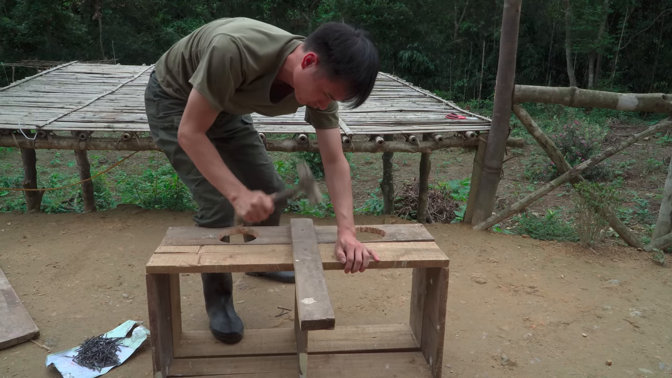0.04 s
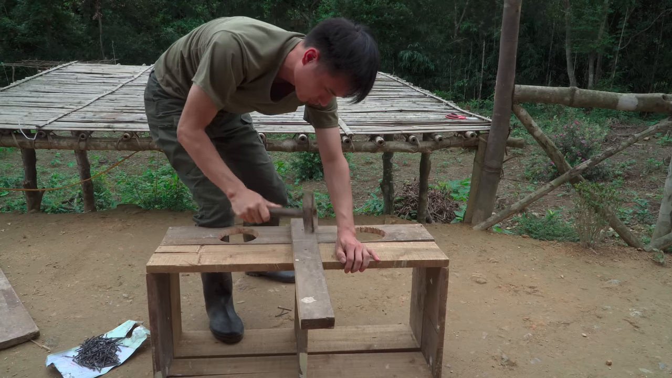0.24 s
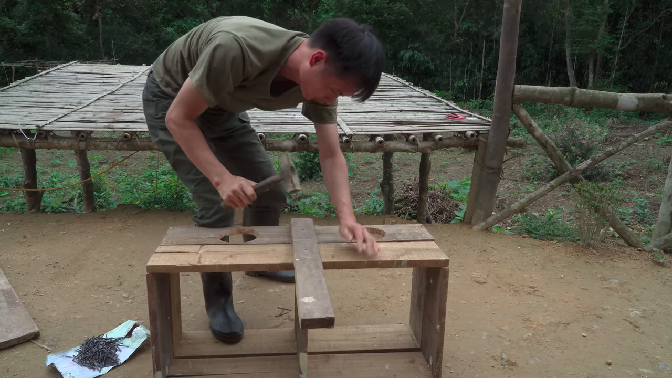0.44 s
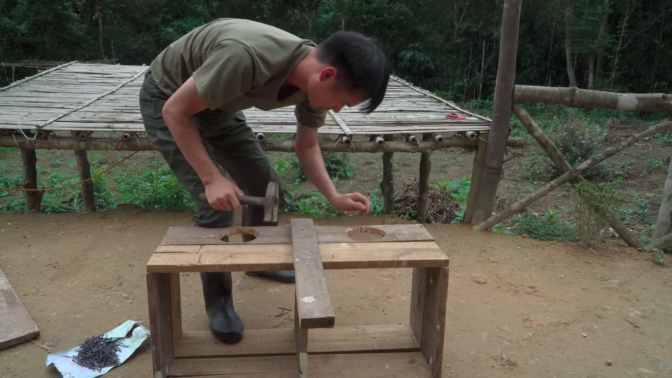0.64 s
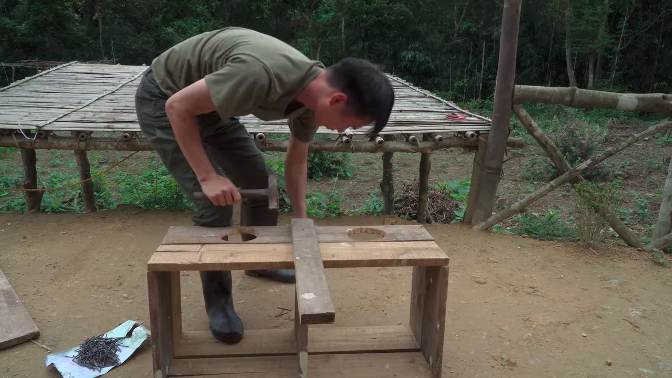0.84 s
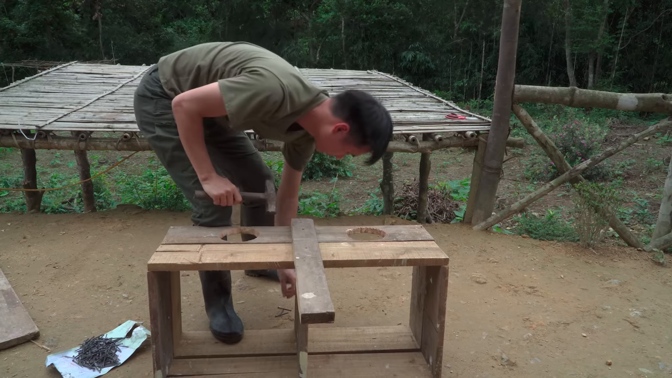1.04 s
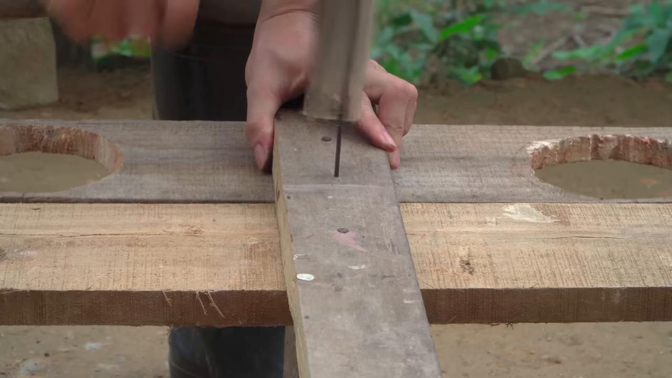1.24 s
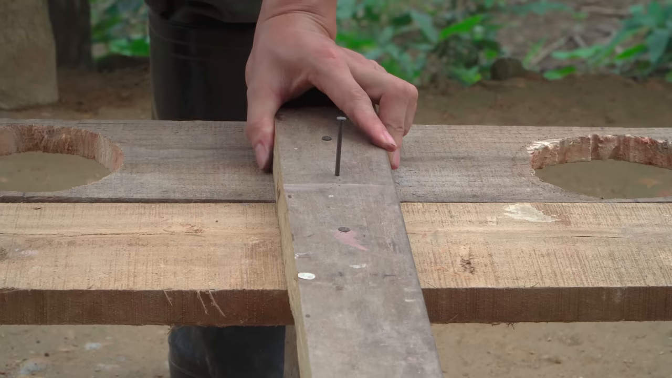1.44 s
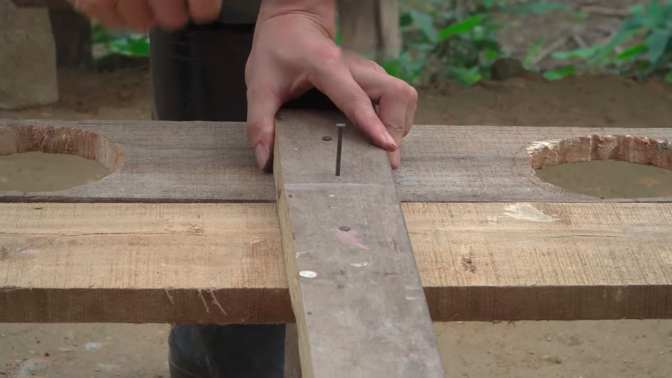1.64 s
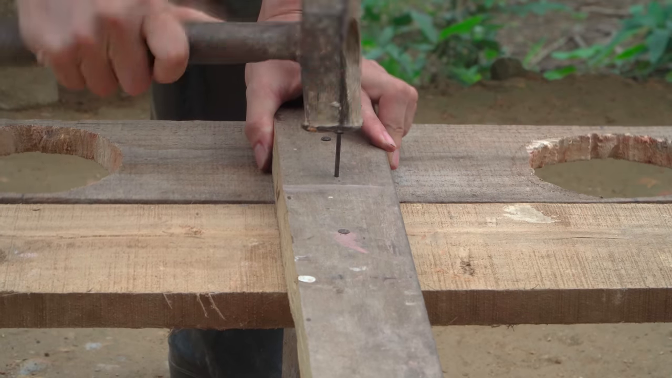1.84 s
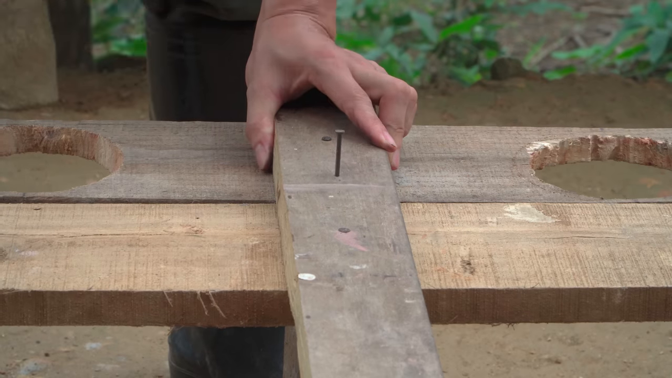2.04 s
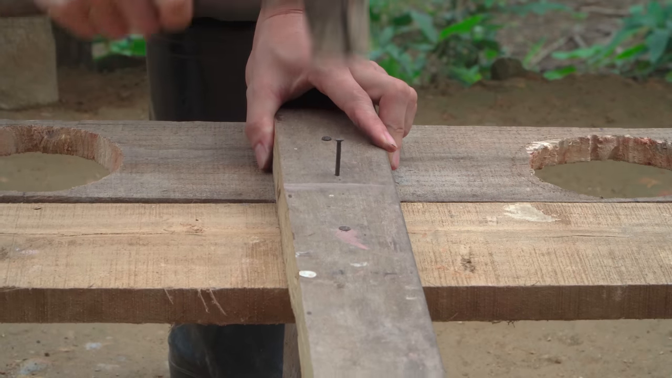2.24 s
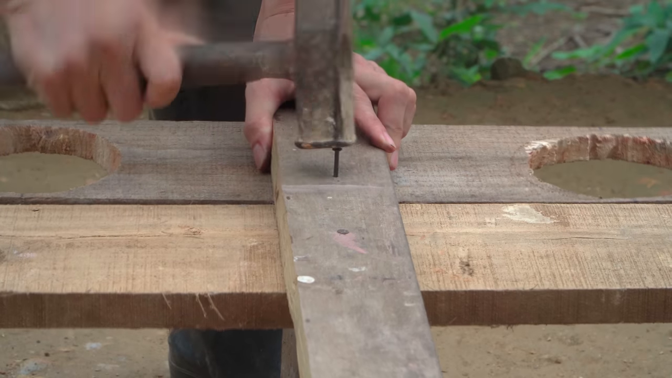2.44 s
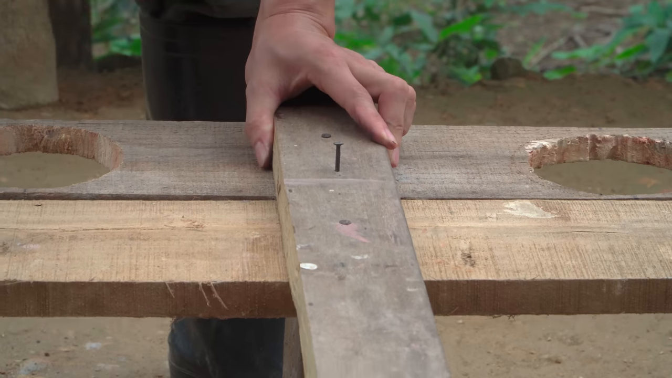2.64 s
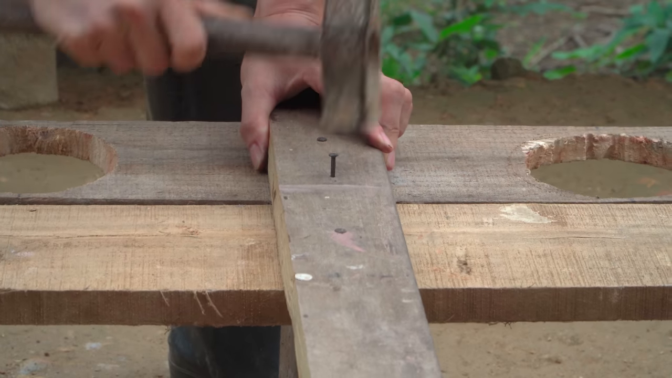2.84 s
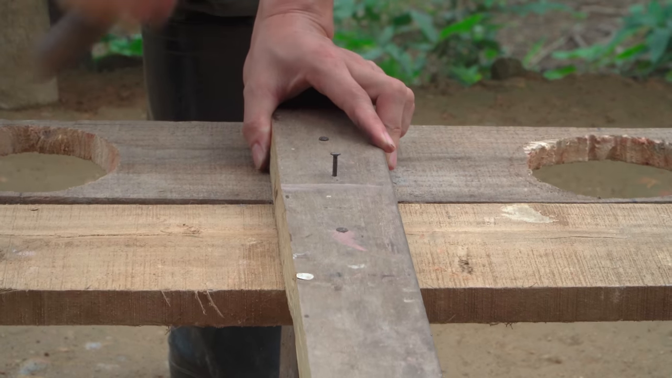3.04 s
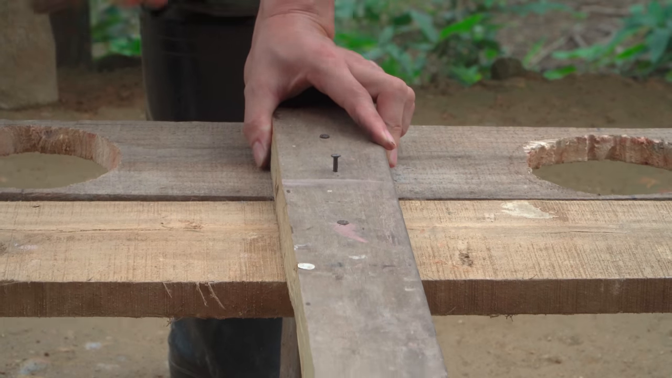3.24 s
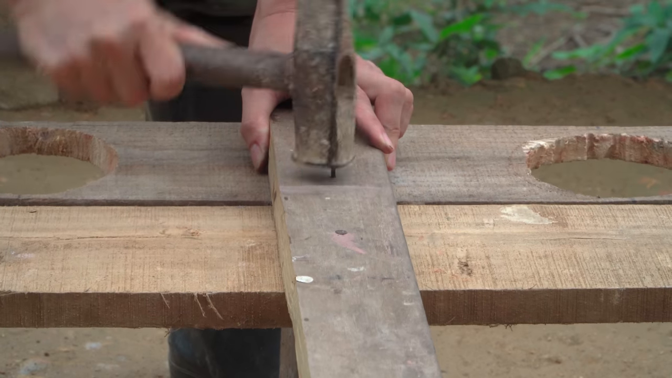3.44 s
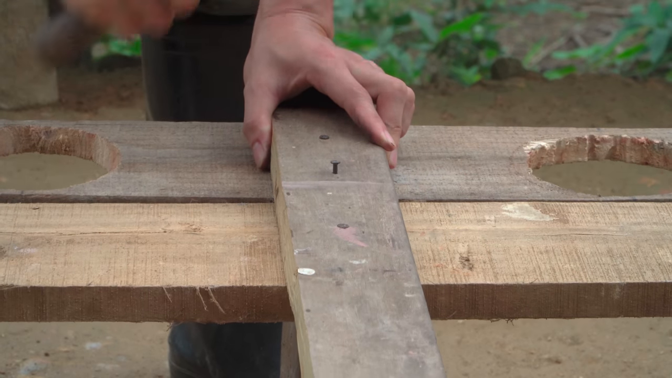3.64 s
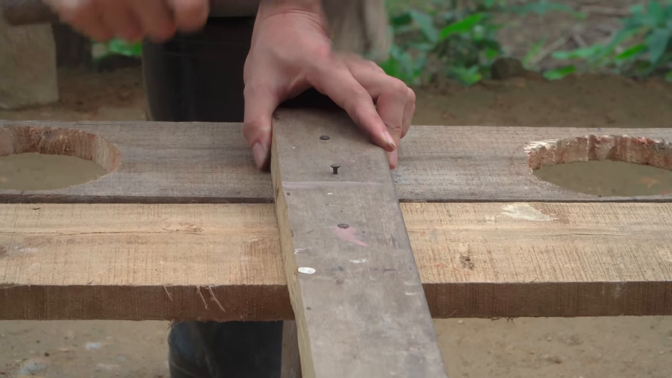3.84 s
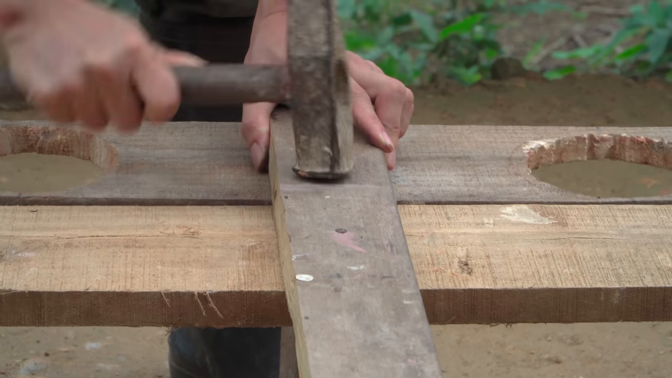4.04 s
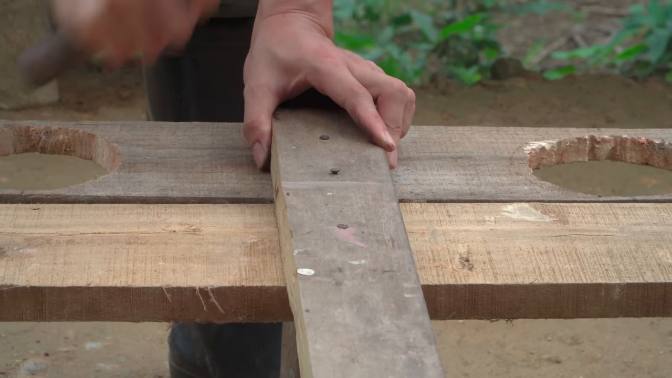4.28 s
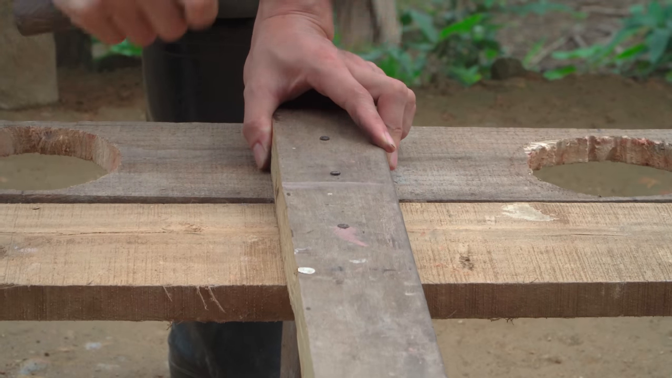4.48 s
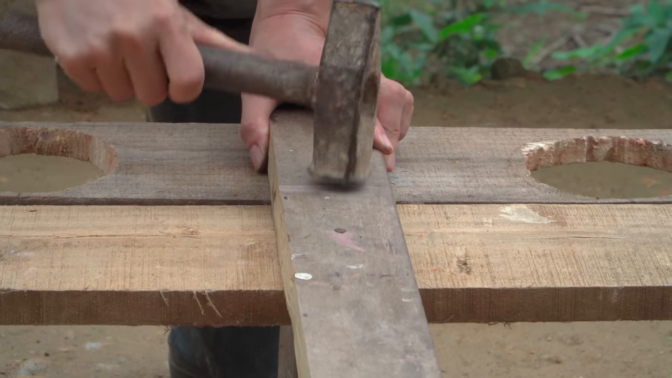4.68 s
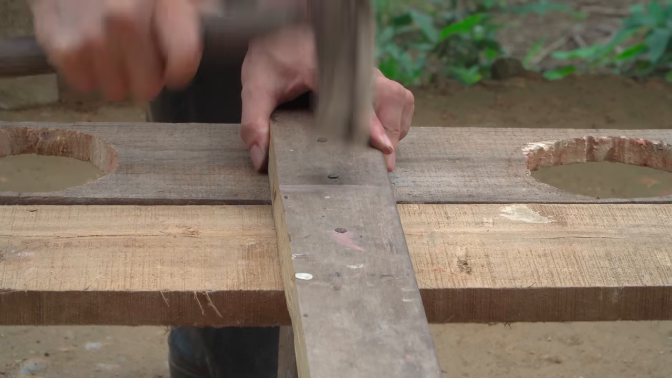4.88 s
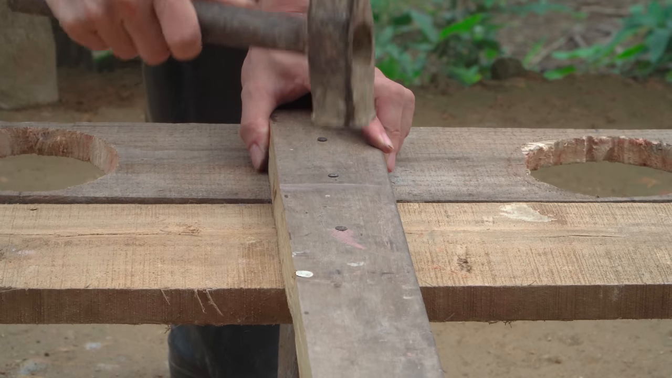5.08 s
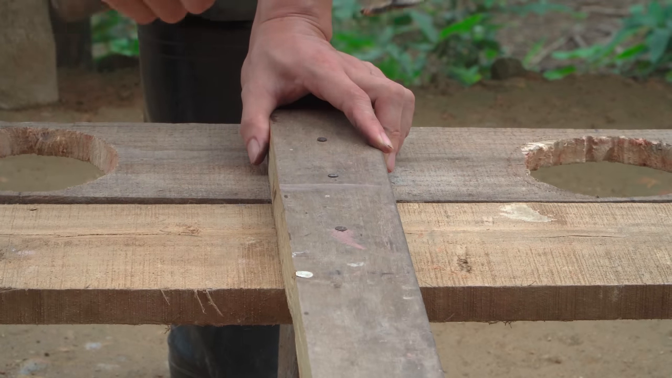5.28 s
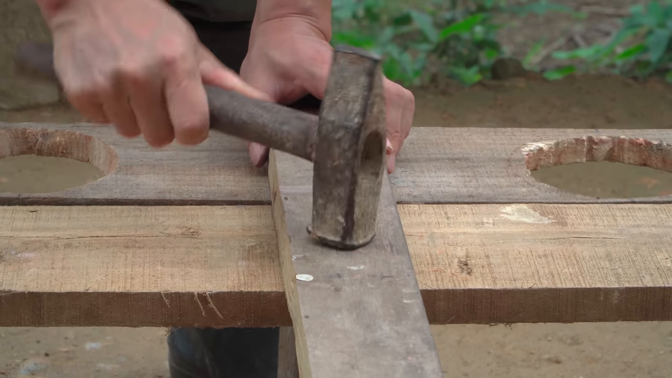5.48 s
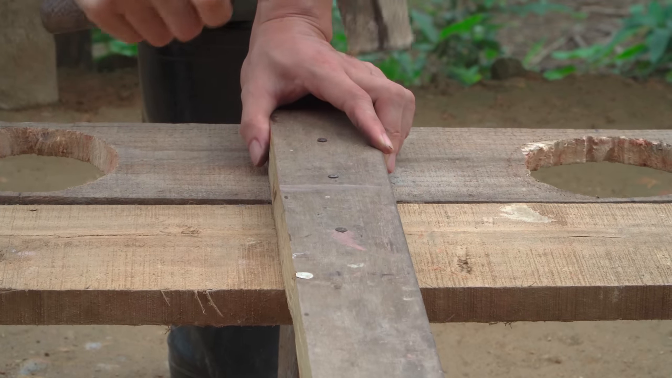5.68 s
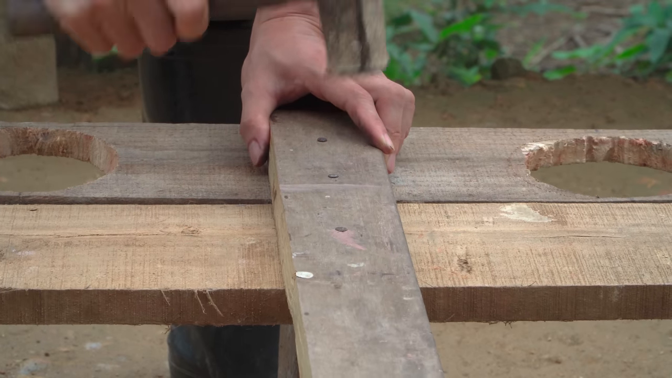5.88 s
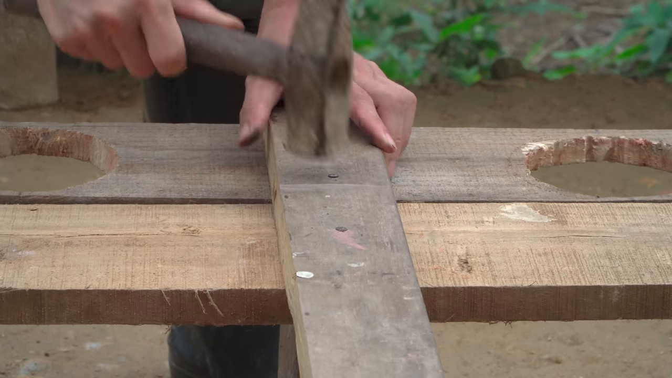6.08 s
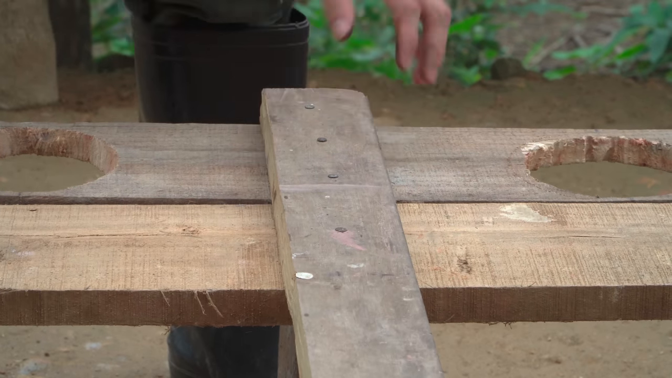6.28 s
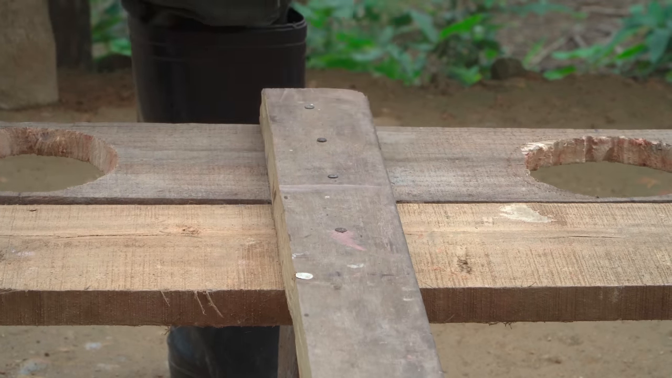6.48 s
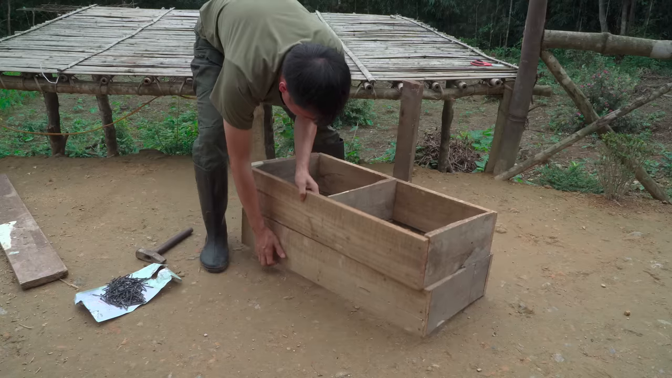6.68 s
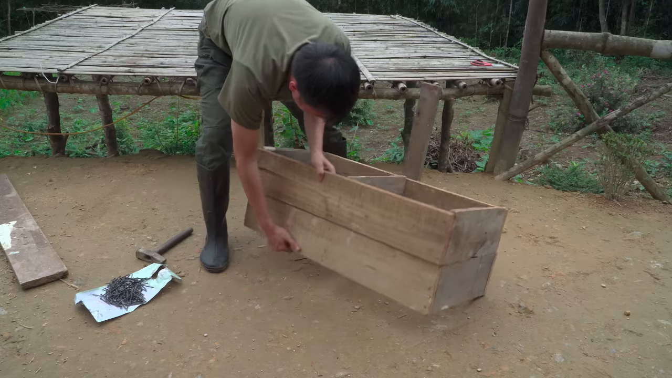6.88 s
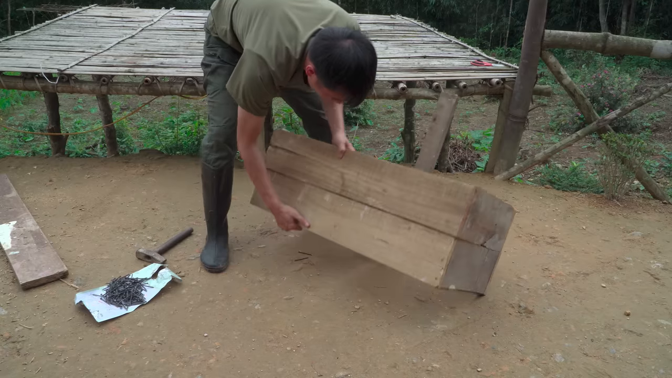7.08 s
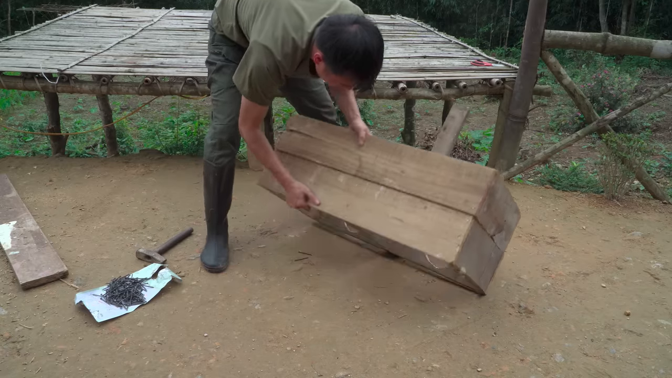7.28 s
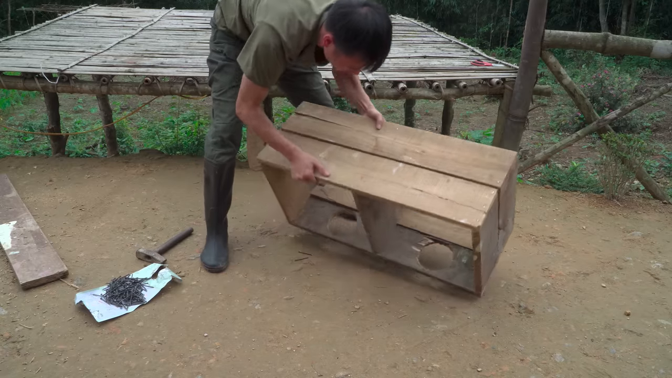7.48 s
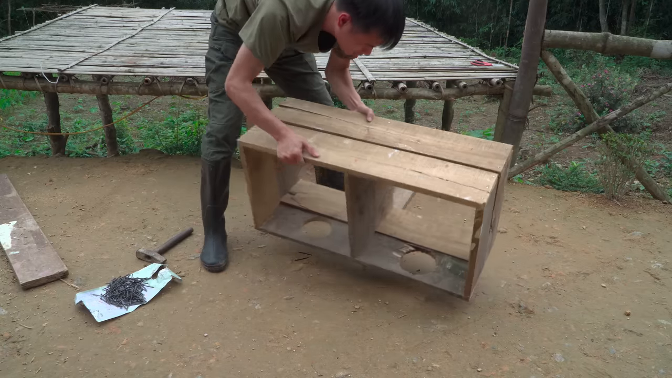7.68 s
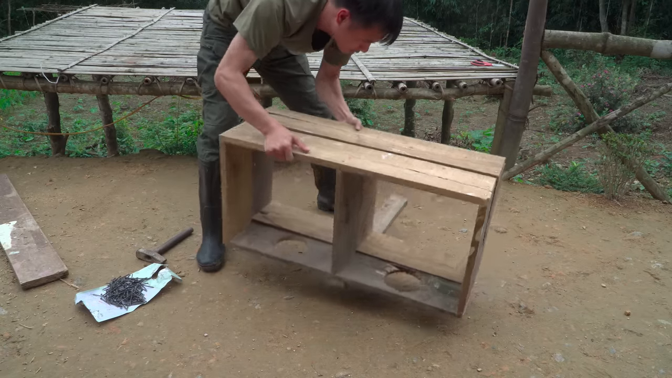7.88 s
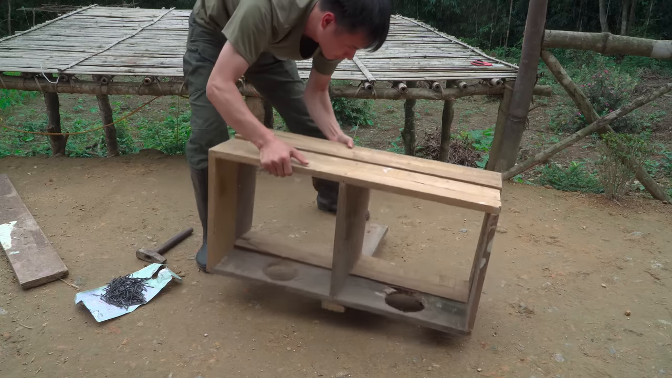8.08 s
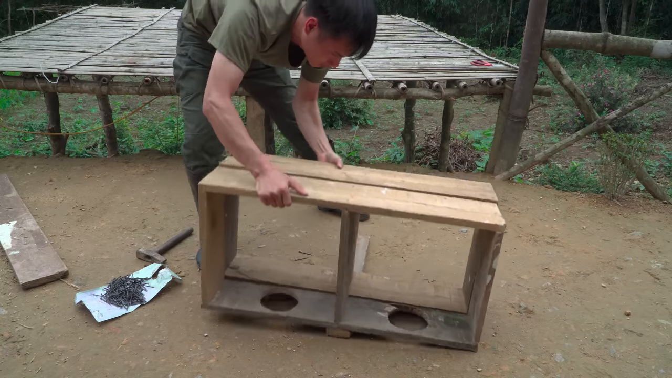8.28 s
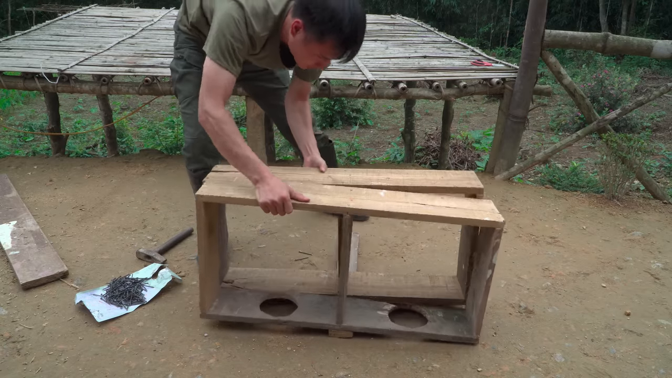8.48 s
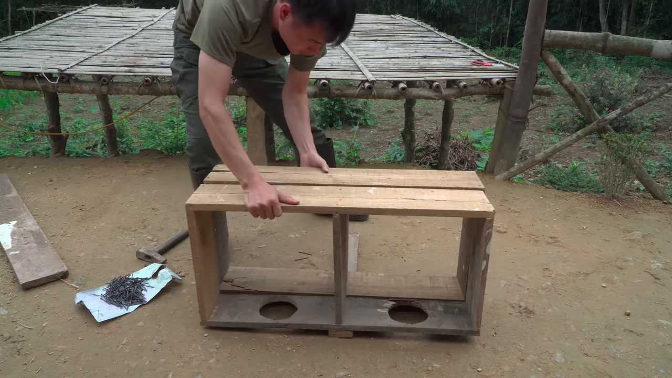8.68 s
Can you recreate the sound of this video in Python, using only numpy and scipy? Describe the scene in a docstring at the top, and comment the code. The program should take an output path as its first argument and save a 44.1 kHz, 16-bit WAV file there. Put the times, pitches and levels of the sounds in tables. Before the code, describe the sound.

Heavy hammer blows crack and ring through a hollow wooden crate outdoors, then the crate is tipped, scraped and set down with a thump.

```python
"""Heavy hammer blows crack and ring as a nail goes through a batten into a wooden crate on an earth yard.
The microphone is close enough to overload. Each blow is short strike modes and a noise slip, ringing
crate modes and boards, then the crate's landing and rattle, a ground thud and an echo from sheds and trees.
Then the crate is dragged, tipped over and set down: low hum, crunching grit and edge knocks.
Small birds whistle as gliding sines over the hush of the yard, a slowly swelling coloured noise."""
import sys
import numpy as np
from scipy import signal
from scipy.fft import irfft
from scipy.io import wavfile
from scipy.ndimage import uniform_filter1d

SR = 44100
rng = np.random.default_rng(int(sys.argv[2]) if len(sys.argv) > 2 else 0)


def materialize(psi):
    """Save the field psi as 16-bit PCM at rate SR to the path in sys.argv[1].

    A 1-D psi becomes a single channel; in a 2-D psi each row is a channel.
    """
    bounded = np.clip(np.atleast_2d(psi).T, -1, 1)
    quanta = np.round(bounded * 32767).astype(np.int16)
    wavfile.write(sys.argv[1], SR, quanta)


N = 384993
T = np.arange(27000) / SR  # time within one struck sound, s


def gain_of(db):
    """Decibels to amplitude."""
    return 10 ** (np.asarray(db) / 20)


def evened(x):
    """Scales to an rms of 1."""
    return x / np.sqrt(np.mean(x ** 2) + 1e-20)


def burst(x):
    """Scales to an rms of 1 over the first 40 ms."""
    return x / np.sqrt(np.mean(x[..., :1764] ** 2) + 1e-20)


def read(points, hz):
    """Reads the second column of a table on a log-frequency axis."""
    f, value = np.transpose(points)[:2]
    return np.interp(np.log(hz + 1), np.log(f + 1), value)


def add(mix, start_s, sound):
    """Adds a stereo sound at start_s; a part before time zero is cut away."""
    start = round(start_s * SR)
    sound, part = sound[:, max(-start, 0):], mix[:, max(start, 0):]
    size = min(sound.shape[1], part.shape[1])
    part[:, :size] += sound[:, :size]


def highpass(x, hz):
    """Gently keeps the part of x above hz."""
    return signal.sosfilt(signal.butter(1, min(hz, SR / 3), "high", fs=SR, output="sos"), x)


def lowpass(x, order, hz):
    """Keeps the part of x below hz."""
    return signal.sosfilt(signal.butter(order, hz, fs=SR, output="sos"), x)


def bandpass(x, order, edges_hz):
    """Keeps the part of x between two edges."""
    return signal.sosfilt(signal.butter(order, edges_hz, "band", fs=SR, output="sos"), x)


def brighten(x, db, hz):
    """Lifts or lowers the treble above about hz."""
    return x + (gain_of(db) - 1) * highpass(x, hz)


def rise(seconds, t=T):
    """A smooth start."""
    return np.sin(np.pi / 2 * np.clip(t / seconds, 0, 1)) ** 2


def stereo_spectrum(colour, side, size):
    """Random left and right spectra of a given colour and width."""
    hz = np.fft.rfftfreq(size, 1 / SR)
    mid, wide = np.exp(2j * np.pi * rng.random((2, len(hz))))
    width = gain_of(read(side, hz))
    return hz, np.array([mid + width * wide, mid - width * wide]) * gain_of(read(colour, hz))


# stereo width of sounds at the crate: pitch_hz, side_minus_mid_db
NEAR_SIDE = [(60, -24), (300, -15.5), (750, -11.5), (1400, -7.5), (2800, -8), (6000, -1.5)]
# stereo width of the yard around it: pitch_hz, side_minus_mid_db
FAR_SIDE = [(200, -12), (750, -5.5), (1500, -5), (6000, -0.5)]


def crowd(bands, side=NEAR_SIDE):
    """Countless modes struck at once, as coloured noise; each band dies at its own speed."""
    hz, spectrum = stereo_spectrum(bands, side, len(T))
    centres, _, t60s = np.transpose(bands)
    sound = 0
    for one_band, t60 in zip(np.eye(len(bands)), t60s):
        share = np.interp(np.log(hz + 1), np.log(centres), one_band)
        sound = sound + irfft(spectrum * share, len(T)) * gain_of(-60 * T / t60)
    return burst(sound)


MIDDLE_HZ = 800  # pitch at which ring times are given and the tilt leaves levels alone
DAMPING_SLOPE = 0.36  # higher modes die sooner


def modes(table, t60_s, scatter_db, detune, tilt_db=0):
    """Damped sines whose strength varies with the spot struck; the treble differs more between the ears."""
    hz, db = np.transpose(table)
    db = db + tilt_db * np.log2(hz / MIDDLE_HZ)
    t60 = t60_s * (MIDDLE_HZ / hz) ** DAMPING_SLOPE
    strength, pitch, ear = rng.standard_normal((len(hz), 3)).T
    sign = (-1) ** np.arange(len(hz))
    turning = 2j * np.pi * hz * (1 + detune * pitch)
    waves = np.exp(np.outer(turning - np.log(1000) / t60, T[:18000]))
    # opposite phase shifts at the two ears give the width
    lag = np.outer([1, -1], np.arctan(gain_of(read(NEAR_SIDE, hz))) * np.sign(ear))
    sound = ((sign * gain_of(db + scatter_db * strength) * np.exp(1j * lag)) @ waves).imag
    return burst(np.pad(sound, ((0, 0), (0, len(T) - sound.shape[1]))))


# one row a blow, levels relative to the usual blow: start_s, ring_db (crate),
# hop_s (until the crate touches the ground again), boom_db (landing), hollow_db (ring of the landing)
BLOWS = [(-0.135, 7, 0.023, 4, 2), (0.183, 1.5, 0.023, 1.5, 0.5), (1.3313, -1.5, 0.028, -1, -4.5),
         (1.6315, -4, 0.022, -2, -32), (1.9182, 0.5, 0.023, 0.5, 2), (2.2238, -0.5, 0.023, 0, -3.5),
         (2.5237, -1, 0.02, 1, -9), (2.8565, -1.5, 0.024, 0.5, -6), (3.166, -1, 0.026, 2, 1),
         (3.4694, 0.5, 0.026, 3.5, -5), (3.7765, -3, 0.024, 3.5, -13), (4.0896, -0.5, .026, 3.5, -1.5),
         (4.403, -2, 0.023, 4.5, -1), (4.6837, 1.5, 0.025, 2, 3), (4.986, 0, 0.025, 4.5, 5.5),
         (5.5094, -1, 0.028, 4.5, 4.5), (6.0291, -1, 0.036, 1, 5)]
# two tone controls that reshape the blows over time: start_s, control_a (0-1), control_b (0-1)
TONE = [(0.2, 0.82, 0.55), (1.33, 0.39, 0.2), (3.78, .78, 0.5), (4.09, 1, 0.05), (4.4, 1, 0.24),
        (4.749, 0.54, 0.85), (5.5, 0.87, 1)]
ALIKE = 0.7  # the same spot is struck, so the boards ring much as they did before


def hammering():
    """Strike, ringing wood, landing, thud and echo of every blow, reshaped by two tone controls."""
    out, boards = np.zeros((2, N)), crowd(BOARDS)
    times, a_values, b_values = np.transpose(TONE)
    for start_s, ring_db, hop_s, boom_db, hollow_db in BLOWS:
        control_a, control_b = np.interp(start_s, times, a_values), np.interp(start_s, times, b_values)
        control_a, control_b = np.clip([control_a, control_b], 0, 1)
        tone = np.array([1, control_a, control_b])  # weighs the columns base_db, added_by_a, added_by_b
        boards = ALIKE * boards + np.sqrt(1 - ALIKE ** 2) * crowd(BOARDS)
        paths = board_paths(0.3)
        tail = 1.35 if start_s < 1 else 1  # the first blows have a longer tail
        answer = echo(tone @ ECHO_DB, tone @ ECHO_TREBLE_DB, tail)
        blow = np.zeros((2, SR))
        add(blow, 0, strike(control_b) + crate_ring(ring_db, tone))
        add(blow, 0, signal.fftconvolve(board_ring(boards, tone, control_b), paths, axes=1))
        add(blow, hop_s, landing(boom_db, hollow_db))
        add(blow, hop_s + RATTLE_LAG_S, rattle(tone))
        add(blow, 0.0155, thud(tone))
        add(blow, 0, signal.fftconvolve(answer, paths, axes=1))
        add(out, start_s, blow)
    return out


# hammer head, nail and batten: pitch_hz, level_db (relative)
STRIKE = [(331, -0.5), (921, -9), (1076, 3), (1510, -1.5), (2084, 5), (2770, -6.5), (3310, 5), (4027, 7),
          (4462, 7.5), (6100, -0.5), (8350, -6)]
# stereo width of the nail's slip: pitch_hz, side_minus_mid_db
SLIP_SIDE = [(500, -42), (6000, -28)]
CRACK_DB, SLIP_DB = -8, -15  # before shaping
STRIKE_T60_S = 0.032  # at MIDDLE_HZ, before the short envelope


def strike(control_b):
    """Strike modes cut short within a few milliseconds, and a noise burst as the nail slides."""
    crack = modes(STRIKE, STRIKE_T60_S, scatter_db=1.0, detune=0.0036)
    crack = gain_of(CRACK_DB) * crack * rise(0.0022) * np.exp(-(T / 0.0053) ** 2)
    slip = brighten(crowd(BOARDS, SLIP_SIDE), 22.7, 6200)
    slip = gain_of(SLIP_DB) * slip * np.exp(-(T / 0.0033) ** 4)
    return brighten(crack + slip, -5 * control_b, 1900)  # control b dulls it


# clear modes of the crate: pitch_hz, level_db (relative)
CRATE = [(259, 0), (303, 0), (344, -7.5), (366, -4.5), (511, 1), (696, -0.5), (762, 1), (802, 8.5),
         (897, 1), (1046, -2.5), (1144, -5), (1252, -8), (1380, -21), (1464, -4.5), (1506, 1.5),
         (1583, -4.5), (1995, -5), (2316, -7), (2849, -4.5)]
# tilt of the ring in dB per octave: base, added_by_a, added_by_b
RING_TILT = (6.5, -1.5, -2.5)
RING_DB, CRATE_T60_S = -14, 0.23  # level of the usual blow; ring time at MIDDLE_HZ


def crate_ring(ring_db, tone):
    """The crate's clear modes, tilted towards treble or bass by the tone controls."""
    ring = modes(CRATE, CRATE_T60_S, scatter_db=3.5, detune=0.0017, tilt_db=tone @ RING_TILT)
    return gain_of(RING_DB + ring_db) * ring


# the crowd of weaker modes in the boards: pitch_hz, level_db (per Hz, relative), t60_s
BOARDS = [(100.65, -21, 0.39), (140, 0, 0.36), (204, -11.5, 0.54), (316, -3.5, 0.28), (644, 0, 0.3),
          (870, 2.5, 0.31), (1380, -4.5, 0.47), (2670, -5.5, 0.21), (4000, -12, 0.29), (7400, -24.5, 0.26),
          (10250, -29.5, 0.45), (16200, -46.5, 0.92)]
# level and treble of the boards in dB: base_db, added_by_a_db, added_by_b_db
WOOD_DB = (-13, -4.5, 5)
WOOD_TREBLE_DB = (1, 8.5, -13.5)


def board_ring(boards, tone, control_b):
    """The boards' crowd of modes; control b thins the bass."""
    low_cut_hz = 10 + 390 * control_b
    wood = brighten(highpass(boards, low_cut_hz), tone @ WOOD_TREBLE_DB, 3400)
    return gain_of(tone @ WOOD_DB) * wood


def board_paths(depth):
    """Waves reach the air by many short paths through the boards, which ripples the spectrum."""
    size = 480  # samples
    taps = rng.standard_normal(size) * np.linspace(1, 0, size)
    taps *= depth / np.linalg.norm(taps)
    taps[0] = 1  # the direct path
    return taps[None] / np.linalg.norm(taps)


# the crate landing on earth: pitch_hz, level_db (per Hz, relative), t60_s
LANDING = [(50, -41, 0.16), (179, -11, 0.25), (297, 2.5, 0.33), (457, -2.5, 0.18), (750, -1.5, 0.21),
           (1170, -2, 0.064), (2470, -13.5, 0.13), (16000, -80, 0.06)]
BOOM_HZ, HOLLOW_HZ = 417, 1080  # soft earth stirs only the low modes: upper edges of boom and hollow ring


def landing(boom_db, hollow_db):
    """The crate, sprung off the ground, comes down with a slap and rings on its low modes."""
    shaken = modes(CRATE, CRATE_T60_S, scatter_db=2.5, detune=0.0025)
    boom = burst(lowpass(shaken, 3, BOOM_HZ))
    hollow = burst(bandpass(shaken, 2, [BOOM_HZ, HOLLOW_HZ]))
    slap = burst(crowd(LANDING) * np.exp(-(T / 0.0088) ** 2))
    impact = gain_of(-14.5) * crowd(LANDING) + gain_of(-18.5) * boom + gain_of(-22.0) * slap
    return (gain_of(boom_db) * impact + gain_of(hollow_db - 14.5) * hollow) * rise(0.013)


# level of the rattle: base_db, added_by_a_db, added_by_b_db
RATTLE_DB, RATTLE_LAG_S = (-12.5, -10, -2), 0.005


def rattle(tone):
    """The loose batten slaps back on the boards as the crate lands: a short burst of board noise."""
    slaps = burst(highpass(crowd(BOARDS), 790) * np.exp(-T / 0.0067))
    return gain_of(tone @ RATTLE_DB) * slaps * rise(RATTLE_LAG_S)


# the ground shakes: pitch_hz, level_db (per Hz, relative), t60_s
THUD = [(25.2, -12.5, 0.65), (56, -0.5, 1), (100, -2.5, 0.76), (1500, -77, .1)]
# level of the thud: base_db, added_by_a_db, added_by_b_db
THUD_DB = (-29, -2.5, -4)


def thud(tone):
    """The ground's deep shake, a crowd of low modes."""
    return gain_of(tone @ THUD_DB) * crowd(THUD) * rise(0.012)


# sheds and trees answer: pitch_hz, level_db (per Hz, relative), t60_s (before stretching)
ECHO = [(100, -16, 0.15), (417, -24, 0.27), (727, 2, 0.51), (1820, 1.5, 0.31), (2120, 6, 0.38),
        (3980, -4.5, 0.46), (6450, -12.5, 0.52), (9300, -22.5, 0.65), (16000, -36, 0.41)]
# level and treble of a blow's echo in dB: base_db, added_by_a_db, added_by_b_db
ECHO_DB = (-7, 9.5, 5)
ECHO_TREBLE_DB = (6.5, -0.5, -12.5)
FAR_TREES_S, FAR_TREES_DB = 0.275, -29.5  # delay; level relative to level_db
FAR_TAIL = 1.8  # the far trees ring this many times longer than the yard


def echo(level_db, bright_db, length):
    """Scatter from the yard swells over a tenth of a second; a faint dull answer follows from the far trees."""
    bands = [(hz, db, t60 * length) for hz, db, t60 in ECHO]
    near = brighten(crowd(bands, FAR_SIDE), bright_db, 4600)
    far = crowd([(hz, db, t60 * FAR_TAIL) for hz, db, t60 in bands], FAR_SIDE)
    far = lowpass(far, 2, 1400)
    out = np.zeros((2, SR))
    add(out, 0.03, gain_of(-25.0) * crowd(bands, FAR_SIDE) * rise(0.021))
    add(out, 0.095, gain_of(-24.0) * near * rise(0.041))
    add(out, FAR_TREES_S, gain_of(FAR_TREES_DB) * far * rise(0.068))
    return gain_of(level_db) * out


def handling():
    """The crate scrapes over the earth and knocks down on its edges, slightly stronger on the right."""
    return (edge_knocks() + dragging()) * gain_of([[-.5], [.5]])


# the crate knocks on the ground: start_s, thump_db, ring_db (hollow ring of its edge),
# grit_db (earth under its edge, relative to the thump)
KNOCKS = [(6.706, -28, -36, -8.5), (6.735, -21, -37, -18), (6.812, -21, -40, -21), (6.897, -34, -39, -3.5),
          (7.224, -31, -33, -10), (7.264, -26, -29, -16), (7.404, -34, -38, -7), (8.366, -28, -42, -2.5),
          (8.402, 0.5, -19.5, -30.5), (8.432, -4, -36, -27), (8.546, -7.5, -30, -19)]
# body of a knock: pitch_hz, level_db (per Hz, relative), t60_s
KNOCK = [(55, -3, 0.27), (202, -10, 0.34), (295, 4.5, 0.35), (480, -4, 0.17), (695, -3.5, 0.25),
         (2130, -21, 0.069), (15940, -84, .1)]
# earth under the crate's edge: pitch_hz, level_db (per Hz, relative), t60_s
GRIT = [(696, 4.5, 0.16), (1400, 2.5, 0.19), (1850, 6, 0.078), (2680, -2.5, 0.31), (5440, -5, 0.035),
        (16500, -24.5, 0.26)]
# the crate's modes once it is off its feet and held: pitch_hz, level_db (relative)
HELD_CRATE = [(280, 3), (303, 1), (544, -1.5), (700, -3), (755, -1.5), (1094, -12), (1498, -12.5)]
HELD_T60_S = 0.19  # at MIDDLE_HZ
HAND_DAMPING_S = 0.075  # the hands that hold the crate shorten its ring


def edge_knocks():
    """An edge meets the earth: thump, grit, a hollow ring damped by the hands, and the yard's echo."""
    out = np.zeros((2, N))
    for start_s, thump_db, ring_db, grit_db in KNOCKS:
        ring = modes(CRATE, CRATE_T60_S, scatter_db=5, detune=0.019)
        ring = gain_of(ring_db) * burst(bandpass(ring, 2, [720, 950]))  # an edge favours the middle modes
        grit = gain_of(grit_db) * crowd(GRIT)
        held = modes(HELD_CRATE, HELD_T60_S, scatter_db=2.0, detune=0.013)
        thump = gain_of(-14.5) * crowd(KNOCK) + gain_of(-12.0) * held
        knock = gain_of(thump_db) * (thump + grit) + ring * np.exp(-T / HAND_DAMPING_S)
        add(out, start_s, knock * rise(0.00097))
        add(out, start_s, echo(thump_db - 8.0, -2, 1.0))
    return out


# the crate is dragged, one list a drag: start_s, boards_db, grit_db
DRAGS = [
    [(6.62, -40, -45), (6.72, -32, -42), (6.93, -35, -48), (6.997, -28.5, -29), (7.06, -39, -46),
     (7.11, -47, -57)],
    [(8.63, -40, -36), (8.66, -29, -29), (8.73, -25, -28.5)],
]
# a slow drag stirs only the lowest modes: lower and upper edge_hz
HUM_HZ = [250, 302]
# board on board: lower and upper edge_hz
RASP_BAND_HZ = [1240, 1500]
RASP_S, RASP_DB = 8.64, -29.5
SLIPS_PER_S = 600


def dragging():
    """Small random slips on the earth keep the low modes humming and crunch the grit."""
    out, t = np.zeros((2, N)), np.arange(N) / SR
    happens = rng.random(N) < SLIPS_PER_S / SR
    slips = rng.exponential(1, N) * happens * rng.choice([-1, 1], N)
    knock = crowd(KNOCK)
    hum = gain_of(-8.5) * knock + burst(bandpass(knock, 2, HUM_HZ))
    body = evened(signal.oaconvolve(slips[None], hum, axes=1)[:, :N])
    grit = evened(signal.oaconvolve(slips[None], crowd(GRIT), axes=1)[:, :N])
    # level out the random swells, so the drag rows set the loudness
    power = uniform_filter1d((body ** 2).mean(0), size=1500)
    body = body / np.sqrt(power + 1e-6)
    for rows in DRAGS:
        times, boards_db, grit_db = np.transpose(rows)
        out += body * gain_of(np.interp(t, times, boards_db, -120, -120))
        out += grit * gain_of(np.interp(t, times, grit_db, -120, -120))
    # board rubs on board as the crate settles
    rub = evened(bandpass(grit, 1, RASP_BAND_HZ))
    return out + gain_of(RASP_DB) * rub * rise(0.013, t - RASP_S)


# a nail is set on the batten: start_s, level_db (before brightening)
CLICKS = [(1.1151, -27)]


def nail_clicks():
    """A bright grain of noise that dies within a few milliseconds."""
    out = np.zeros((2, N))
    for start_s, db in CLICKS:
        click = brighten(crowd(GRIT), 8.6, 5000) * np.exp(-T / 0.00097)
        add(out, start_s, gain_of(db) * click)
    return out


# air bumps the microphone: centre_s, level_db (peak)
PUFFS = [(1.476, -18.5), (1.606, -24)]


def air_bumps():
    """A soft pressure pulse with a dip on either side, equal in both channels."""
    out = np.zeros((2, N))
    for centre_s, db in PUFFS:
        u = (T - 0.05) / 0.0059
        pulse = (1 - u ** 2) * np.exp(-u ** 2 / 2)
        add(out, centre_s - 0.05, gain_of(db) * np.tile(pulse, (2, 1)))
    return out


# one row a bird's whistle: start_s, length_s, first_hz, last_hz, level_db (at its mean pitch, halfway)
WHISTLES = [(0.43, 0.074, 8070, 6600, -35.5), (0.734, 0.068, 7770, 6050, -45),
            (5.685, 0.15, 5720, 8500, -28), (7.22, 0.086, 5700, 6350, -51), (7.982, 0.067, 5780, 6020, -46),
            (8.653, 0.163, 5680, 8320, -29.5)]
# every whistle glides, lingers and glides on: share of its length (0-1), share of its sweep (0-1)
GLIDE = [(0, 0), (.22, .32), (.54, .38), (.78, .57), (1, 1)]
WHISTLE_ATTACK_S, WHISTLE_RELEASE_S = 0.003, 0.0089
WHISTLE_DB_PER_OCTAVE, WHISTLE_FADE_DB = 19, -2.5  # louder as the pitch climbs, weaker towards the end
WHISTLE_SCATTER_DB = 0  # from the trees


def birds():
    """Thin gliding sines with a slight waver, smeared by decaying noise scatter from the trees."""
    out = np.zeros((2, N))
    trees = rng.standard_normal((2, len(T))) * gain_of(-60 * T / 0.41) * rise(0.0067)
    trees /= np.linalg.norm(trees[0])
    for start_s, length, first_hz, last_hz, db in WHISTLES:
        t = np.arange(0, length, 1 / SR)
        hz = first_hz + (last_hz - first_hz) * np.interp(t / length, *np.transpose(GLIDE))
        waver = 1 + 0.0073 * evened(uniform_filter1d(rng.standard_normal(N), 150))[:len(t)]
        tone = np.sin(2 * np.pi * np.cumsum(hz * waver) / SR)
        climb_db = WHISTLE_DB_PER_OCTAVE * np.log2(hz / hz.mean())
        level = gain_of(db + climb_db + WHISTLE_FADE_DB * (t / length - .5))
        ends = rise(WHISTLE_ATTACK_S, t) * rise(WHISTLE_RELEASE_S, length - t)
        whistle = np.tile(tone * level * ends, (2, 1))
        add(out, start_s, whistle)
        add(out, start_s, gain_of(WHISTLE_SCATTER_DB) * signal.fftconvolve(whistle, trees, axes=1))
    return out


# colour of the background noise: pitch_hz, level_db (per Hz, relative)
HUSH = [(15, -35), (25, -5.5), (200, -8.5), (300, -7), (545, -4.5), (863, -8), (5880, -11), (6380, -14.5),
        (13000, -19.5), (15500, -18)]
# slow treble control of the background noise: start_s, treble_db
TREBLE = [(1.2, -5), (5.2, -19), (6.3, -13), (6.8, -11.5)]
HUSH_DB, HUSH_SWELL_DB_PER_S = -39, 0.56  # level at the start, before the treble is lowered


def hush():
    """Steady coloured noise, slowly swelling and slightly uneven, under a slow treble control."""
    t = np.arange(N) / SR
    air = evened(irfft(stereo_spectrum(HUSH, FAR_SIDE, N)[1], N))
    air = brighten(air, np.interp(t, *np.transpose(TREBLE)), 3100)
    drift_db = .5 * evened(uniform_filter1d(rng.standard_normal(N), 6000))
    return air * gain_of(HUSH_DB + HUSH_SWELL_DB_PER_S * t + drift_db)


def scene():
    """Everything in the yard."""
    return hammering() + handling() + nail_clicks() + air_bumps() + birds() + hush()


EDGE_HZ = 15900  # upper band limit


def record(dry):
    """Loud peaks overload and clip flat at full scale; then a steep low-pass limits the band."""
    clipped = np.clip(dry, -1, 1)
    band_limit = signal.firwin(255, EDGE_HZ, window=("kaiser", 8), fs=SR)
    return signal.oaconvolve(clipped, band_limit[None], "same", axes=1)


dry = scene()
out = record(dry)
materialize(out)
```